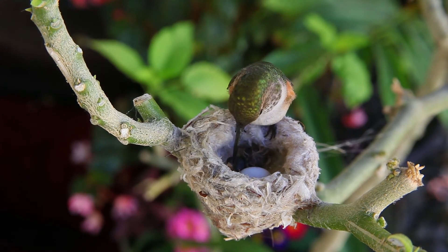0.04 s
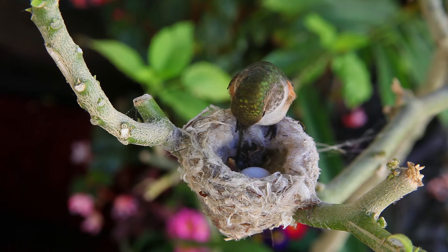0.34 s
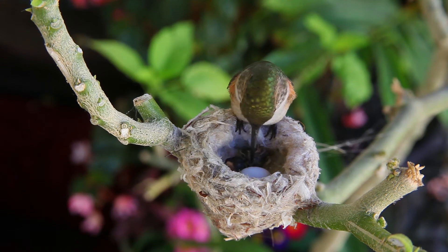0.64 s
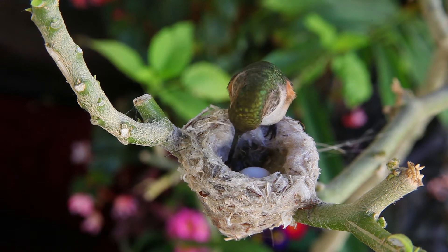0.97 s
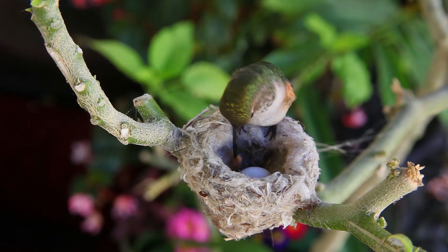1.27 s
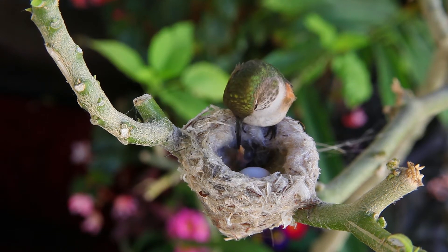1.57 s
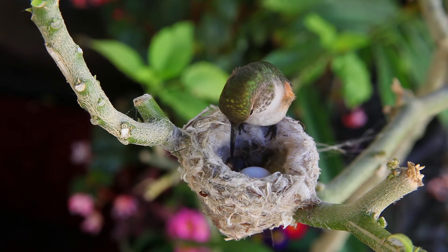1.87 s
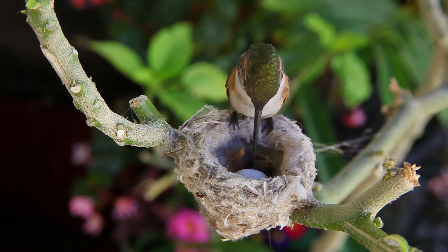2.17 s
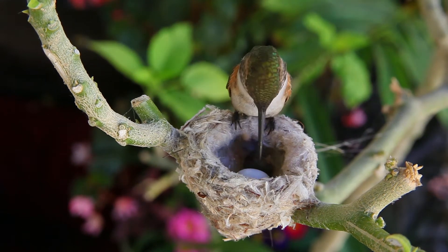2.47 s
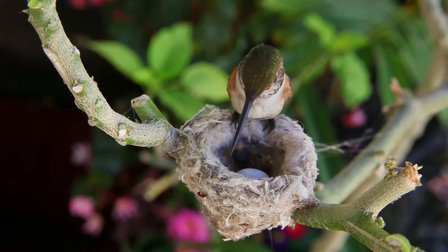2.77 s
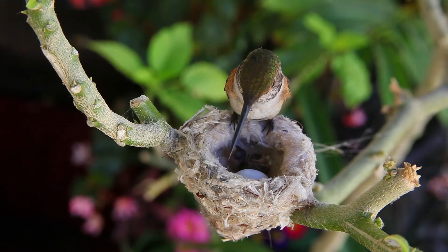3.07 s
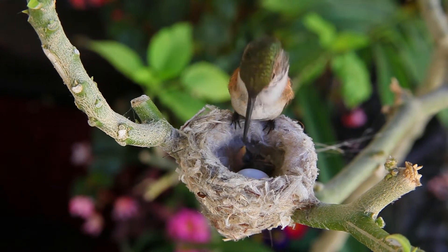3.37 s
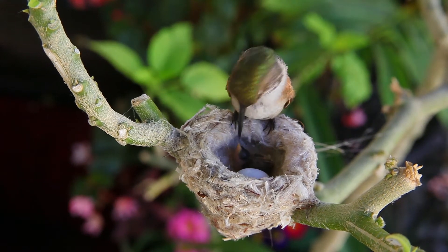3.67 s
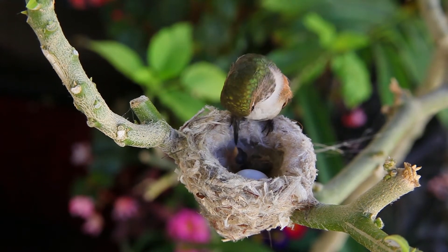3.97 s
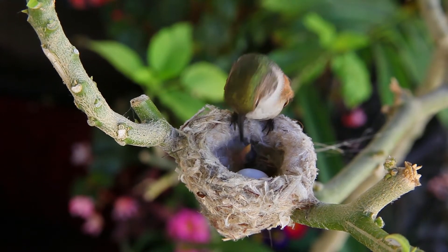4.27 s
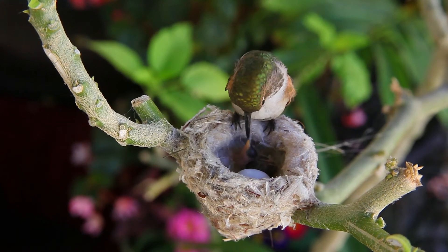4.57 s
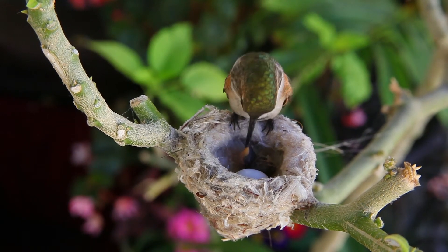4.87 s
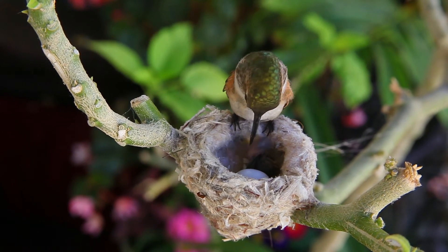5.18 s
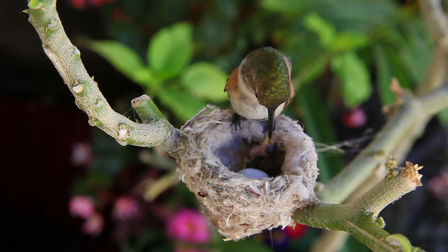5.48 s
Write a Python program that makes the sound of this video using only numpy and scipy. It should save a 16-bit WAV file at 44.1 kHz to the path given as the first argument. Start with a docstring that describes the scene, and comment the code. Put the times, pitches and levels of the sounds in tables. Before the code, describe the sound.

A hummingbird chirps close by, sharp and high, about four times a second, over faint distant traffic in a quiet garden.

```python
"""A quiet garden: a hummingbird chips close by, about four times a second.
Each chip is one whistle plunging from 7-9 kHz to 2.5 kHz in 20-25 ms, its overtones sweeping
through the throat's resonance. Leaves and walls scatter it back.
Far traffic, a hiss of air and a faint engine hum lie underneath."""
import sys
import numpy as np
from scipy import signal
from scipy.fft import rfft, irfft
from scipy.io import wavfile

SR = 44100
rng = np.random.default_rng(int(sys.argv[2]) if len(sys.argv) > 2 else 0)


def int16_out(signal):
    """Quantize to a 16-bit WAV file."""
    q = np.round(np.clip(np.atleast_2d(signal).T, -1, 1) * 32767)
    wavfile.write(sys.argv[1], SR, q.astype(np.int16))


N = 248283
TIME = np.arange(N) / SR


def bird(gain_db=-13.5):
    """Chips, direct plus scattered; the head moves, so each scatters differently."""
    # mid_plunge_s, force_db, treble_beam_db, beak_gape (0 shut, 1 wide)
    chips = [(-.075, 3.5, -6, 0.06), (.1418, 1.5, -5.5, 0.18), (.3910, 0, -3, 0.03), (.5616, 1.5, -2, 0.18),
             (0.7895, .5, -2, 0.17), (1.0644, 0, -9.5, .1), (1.327, -0.2, -9, 0.07),
             (1.5117, -0.5, -0.5, 0.15), (1.7926, 0.5, -1, 0.1), (1.9809, -.5, -2, 0.13),
             (2.2650, -0.4, -0.5, 0.86), (2.5791, -.3, -1.5, 1), (2.8190, -.3, -1, .98),
             (3.0335, 0, 0, .72), (3.3058, .5, 0.1, 0.62), (3.4901, -1, 1.2, 0.5), (3.6817, -0.3, 1.1, 0.3),
             (3.8556, -0.4, 0, 0.41), (4.1172, 0, -4, 0.04), (4.5000, -1, -5.5, 0.04),
             (4.6640, -.5, 2, 0.07), (4.9350, 0, -7.5, 0.08), (5.2358, 0, -8, 0.08), (5.4168, 0, 1, .2)]
    out = np.zeros(N + 2 * SR)  # 1 s margin each end
    for mid_s, force_db, beam_db, gape in chips:
        lead_ms, direct, spilled = chip(beam_db, gape)
        call = garden(spilled)
        call[:len(direct)] += direct
        start = SR + int((mid_s - lead_ms / 1000) * SR)
        out[start:start + len(call)] += from_db(force_db) * call
    return from_db(gain_db) * out[SR:SR + N]


def chip(beam_db, gape, mid_hz=5933, period_growth_per_ms=0.077,
         attack_ms=1.1, hold_ms=7.84, release_ms=10.24):
    """Plunging syrinx whistle through the throat: lead-in time, direct beam, spill into the garden."""
    # level_db per harmonic, fundamental first
    harmonics_db = [0, -12, -25, -20.5, -35]
    # beak nearly shut: freq_hz, gain_db
    throat = [(2400, -28), (3400, -31.5), (4050, -22), (4650, -19), (5250, -10.5), (5900, -4), (6450, 0),
              (7200, -3.5), (8400, -3), (9600, -8), (11200, -12.5), (12800, -26.5), (15500, -33.5)]
    # wider beak: later, lower start; richer overtones; higher resonance
    lead_ms = np.interp(gape, [0, 1], [7.2, 3.5])
    top_hz = np.interp(gape, [0, 1], [9000, 7180])
    overtone_db = np.interp(gape, [0, 1], [-2, 2])
    throat_shift = 1 + 0.042 * gape
    ms = np.arange(-lead_ms, hold_ms + release_ms, 1000 / SR)  # 0 at mid-plunge
    lead_left = np.clip(-ms / lead_ms, 0, 1)
    late_ms = np.maximum(ms, 0)
    unsteadiness = np.sqrt(2 * late_ms / ms[-1])
    waver = 0.02 * unsteadiness * drift(12, len(ms))
    flutter_db = unsteadiness * drift(12, len(ms))
    # pitch tips over, then the period grows steadily
    hz = mid_hz / (1 + period_growth_per_ms * late_ms)
    hz += (top_hz - mid_hz) * np.sin(np.pi / 2 * lead_left)
    hz *= 1 + waver
    phase = 2 * np.pi * np.cumsum(hz) / SR
    # syrinx is weaker and purer at the top of its range
    high = np.interp(hz / throat_shift, [6750, 7900], [0, 1])
    overtone_db = overtone_db - 10.5 * high
    ramp = np.clip(np.minimum((ms + lead_ms) / attack_ms, (ms[-1] - ms) / release_ms), 0, 1)
    force = from_db(flutter_db - 12 * high) * np.sin(np.pi / 2 * ramp) ** 2
    direct = spilled = 0
    for k, level_db in enumerate(harmonics_db, 1):
        partial_hz = k * hz
        source = force * from_db(level_db + (k > 1) * overtone_db) * np.sin(k * phase)
        source *= partial_hz < SR / 2
        open_beak_db = gape * np.interp(partial_hz, [10000, 14000], [0, 5.5])
        voiced = source * at_hz(throat, partial_hz / throat_shift) * from_db(open_beak_db)
        aim_db = beam_db * np.interp(partial_hz, [4600, 6400], [0, 1])  # only treble is directional
        direct += voiced * from_db(aim_db)
        spilled += voiced * from_db(0.77 * aim_db)
    return lead_ms, direct, spilled


def garden(x, scatter_db=-14, reflect_db=-2, grain_spread_db=4.5, path_spread_db=1.5):
    """Grainy leaf scatter plus distinct reflections, duller the longer their path."""
    # near leaves, garden, far side: start_s, peak_s, level_db, t60_s, cutoff_hz
    scatter = [(.001, 0.004, 3, 0.11, 15050), (.005, 0.032, -17, 0.44, 11400),
               (0.072, 0.085, -22, 0.28, 9400)]
    # freq_hz, gain_db
    scatter_colour = [(2500, -0.5), (4500, 0), (6400, -5), (7100, -4), (7700, 2.5), (8600, -0.5),
                      (10000, -4), (15000, 1)]
    # branches, ground, walls: delay_ms, level_db
    reflections = [(2.54, -24), (4.72, -17), (5.62, -20), (8.54, -25), (9.88, -22), (11.05, -22),
                   (12.07, -24), (15.69, -28), (53.5, -38), (61.7, -39), (94.5, -41)]
    size = SR // 2
    t = np.arange(size) / SR
    hz = np.fft.rfftfreq(size, 1 / SR)
    colour = at_hz(scatter_colour, hz)
    leaves = paths = 0
    for start_s, peak_s, level_db, t60_s, cutoff_hz in scatter:
        grains = rng.standard_normal(size)
        grains *= from_db(grain_spread_db * np.clip(rng.standard_normal(size), -3, 3))
        grains = irfft(rfft(grains) * colour / np.hypot(1, (hz / cutoff_hz) ** 10), size)
        build_up = np.interp(t, [start_s, peak_s], [0, 1])
        leaves += grains * build_up * from_db(level_db - 60 * np.maximum(t - peak_s, 0) / t60_s)
    for delay_ms, level_db in reflections:
        absorbed_db = 0.6 * delay_ms * (hz / 10000) ** 2
        gain = from_db(level_db + path_spread_db * rng.standard_normal() - absorbed_db)
        paths += gain * np.exp(-2j * np.pi * hz * delay_ms / 1000)
    diffuse = from_db(scatter_db) * leaves / np.linalg.norm(leaves)
    return signal.fftconvolve(x, diffuse + from_db(reflect_db) * irfft(paths, size))


def traffic(road_fade_db_per_s=0.3, air_db=-61.5, air_swell_db=2, air_fade_db_per_s=0.14):
    """Receding far road; passing cars swell and sink in pitch, and the air's hiss swells with them."""
    # nearest_s, half_power_s, tyre_db, engine_db
    cars = [(1.62, .38, -64, -80.5), (3.2, .35, -63.5, -64)]
    # freq_hz, density_db
    air = [(20, -4.5), (50, 1), (75, 4), (100, 1), (150, -3), (220, 0), (340, -1.5), (500, -3), (900, -5),
           (1400, -6.5), (2000, -10), (3000, -18.5), (6500, -21.5), (9000, -34), (12000, -36), (16000, -36)]
    road = tyres_and_engines(-72.5, -76) * from_db(-road_fade_db_per_s * TIME)
    busy = 0
    for nearest_s, half_power_s, tyre_db, engine_db in cars:
        near = swell(nearest_s, half_power_s)
        doppler = 1 - 0.05 * near * (TIME - nearest_s) / half_power_s
        road += near * tyres_and_engines(tyre_db, engine_db, doppler)
        busy += near
    return road + from_db(air_db + air_swell_db * busy - air_fade_db_per_s * TIME) * noise(air)


def tyres_and_engines(tyre_db, engine_db, doppler=1):
    """Tyre rush over a lower engine drone."""
    tyres = from_db(tyre_db) * drone(centre_hz=943, width_oct=0.43, doppler=doppler)
    engines = from_db(engine_db) * drone(centre_hz=293.3, width_oct=0.61, doppler=doppler)
    return tyres + engines


def hum(wander_hz=2.2, throb_db=3):
    """Low tones of distant engines, each swelling once, wavering in pitch and level."""
    # pitch_hz, peak_s, half_amplitude_s, level_db
    tones = [(39.7, 2.3, 0.56, -65), (38.5, 4.6, 0.5, -67), (120, 2.08, .17, -65), (118.6, 3.9, 1.8, -70),
             (167.4, 2.35, 1.76, -71)]
    out = 0
    for pitch_hz, peak_s, half_s, level_db in tones:
        phase = 2 * np.pi * np.cumsum(pitch_hz + wander_hz * drift(50)) / SR
        rms = swell(peak_s, half_s) ** 2 * from_db(level_db + throb_db * drift(45))
        out += np.sqrt(2) * rms * np.sin(phase)
    return out


def drone(centre_hz, width_oct, doppler):
    """Noise band, rms 1, resampled by the Doppler ratio."""
    offset_oct = np.log2((np.fft.rfftfreq(N, 1 / SR) + 1) / centre_hz)
    band = irfft(rfft(rng.standard_normal(N)) * np.exp(-(offset_oct / width_oct) ** 2), N)
    position = np.cumsum(doppler * np.ones(N)) % N
    return np.interp(position, np.arange(N), band / band.std())


def noise(spectrum):
    """Coloured noise, rms 1."""
    x = irfft(rfft(rng.standard_normal(N)) * at_hz(spectrum, np.fft.rfftfreq(N, 1 / SR)), N)
    return x / x.std()


def swell(nearest_s, half_power_s):
    """1/distance gain of a passing source."""
    return 1 / np.hypot(1, (TIME - nearest_s) / half_power_s)


def drift(points, size=N):
    """Random curve through evenly spaced points."""
    return np.interp(np.linspace(0, points - 1, size), np.arange(points), rng.standard_normal(points))


def at_hz(spectrum, hz):
    """Gain at hz from (freq_hz, gain_db) rows."""
    knots_hz, gain_db = np.transpose(spectrum)
    return from_db(np.interp(np.log(hz + 1e-9), np.log(knots_hz), gain_db))


def from_db(db):
    """Decibels to gain."""
    return 10 ** (np.asarray(db) / 20)


def scene():
    """Bird over the far town, mono."""
    return (bird() + traffic() + hum())[None]


def record(dry):
    """Steep low-pass at 16 kHz."""
    return signal.sosfilt(signal.ellip(10, 0.1, 70, 16000, fs=SR, output="sos"), dry)


dry = scene()
out = record(dry)
int16_out(out)
```